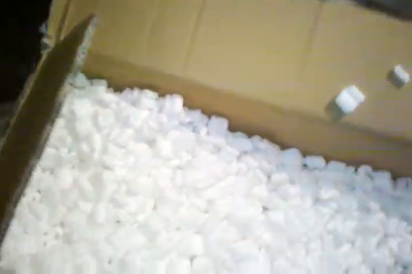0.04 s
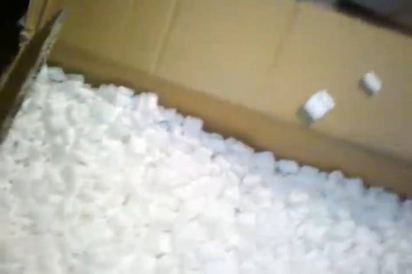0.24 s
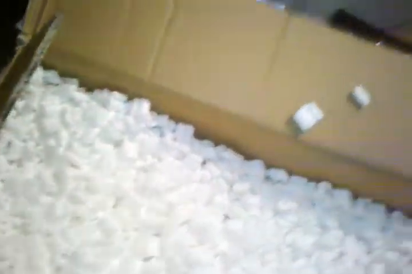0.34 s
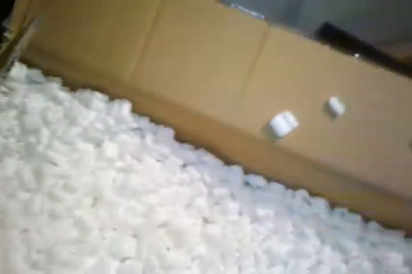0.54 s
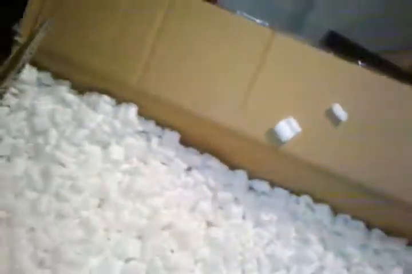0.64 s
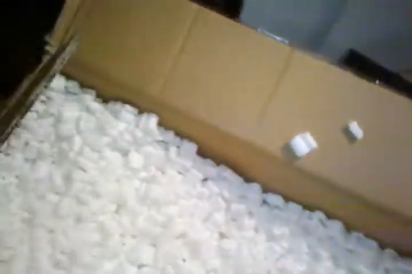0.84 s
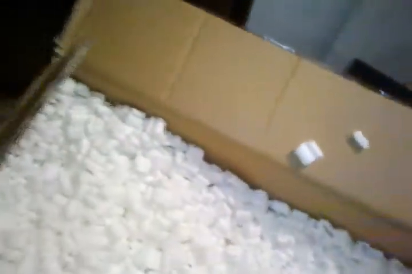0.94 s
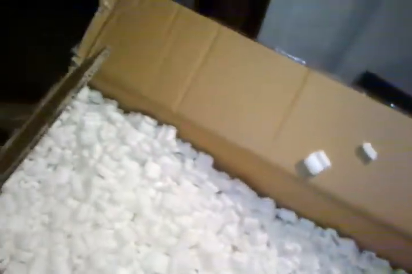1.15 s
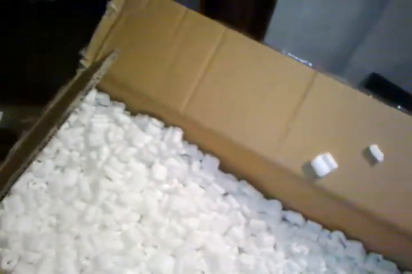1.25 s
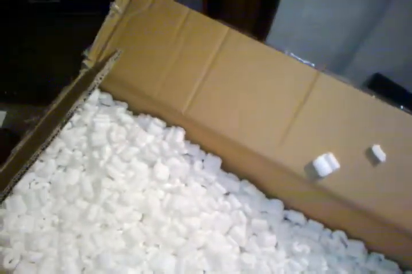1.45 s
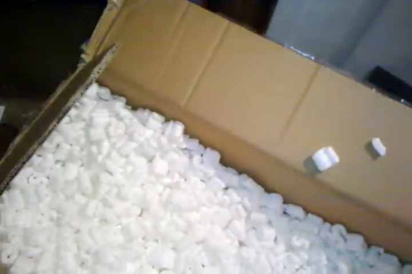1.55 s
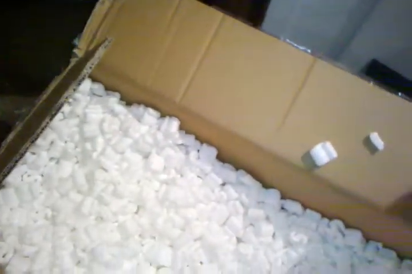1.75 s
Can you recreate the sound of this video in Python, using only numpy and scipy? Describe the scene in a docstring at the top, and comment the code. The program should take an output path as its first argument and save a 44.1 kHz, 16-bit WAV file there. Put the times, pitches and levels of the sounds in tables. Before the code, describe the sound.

Foam packing peanuts rustle in a cardboard box, close and wide in stereo. Faint rubbing opens; at 0.23-0.27 s bright snaps cluster into one hard crack on the right. Squeaky, gritty strokes follow, strongest around 0.4-0.6 s, with light cardboard knocks near 0.38, 0.49 and 0.88 s. After 1.05 s, a soft low bump and dull handling rumble, then sparse tiny ticks over faint room noise until about 1.8 s.

```python
"""A hand rubs close to the microphones beside a box of foam packing peanuts, over faint room noise, hum and
hiss: rubbing strokes of tiny slips. Sharp snaps of filtered noise cluster at 0.23-0.27 s with one hard crack;
light modal knocks start at 0.38 s. From 1.05 s a low handling rumble rises with a soft bump, rubbing dies out
and pieces tick into place. The close microphones' stereo is widened by subtracting each, delayed, from the
other; gain control follows."""
import sys
import numpy as np
from scipy import signal
from scipy.fft import rfft, irfft, next_fast_len
from scipy.io import wavfile
from scipy.ndimage import map_coordinates

SR = 44100
rng = np.random.default_rng(int(sys.argv[2]) if len(sys.argv) > 2 else 0)


def pcm_store(signal):
    """Save signal as 16-bit PCM."""
    levels = np.round(np.clip(np.atleast_2d(signal), -1, 1) * 32767)
    wavfile.write(sys.argv[1], SR, levels.astype(np.int16).T)


N = 79380

# Levels are nominal, ahead of source filters, microphone balance, widening and gain control.
# rubbing strokes: full_from_s, rise_s, hold_s, fall_s, level_db; rise and fall span 20 dB
RUB_STROKES = [(0.0, 0.016, 0.086, 0.3, -51.5), (0.221, 0.034, 0.05, 0.019, -46),
               (0.291, 0.0085, 0.007, 0.2, -42), (0.388, 0.065, 0.0066, 0.017, -34),
               (0.414, 0.023, 0.027, 0.059, -40.5), (0.484, 0.026, 0.017, .11, -31.5),
               (0.659, 0.055, 0.037, 0.079, -42.5), (.772, 0.02, 0.058, 0.0093, -37.5),
               (0.864, 0.046, 0.063, 0.042, -42), (.998, 0.066, 0.027, 0.034, -45.5),
               (1.088, 0.055, 0.018, 0.15, -57.5), (1.337, 0.083, .015, 0.045, -61.5),
               (1.717, 0.018, 0.02, .04, -64.5)]
# rubbing friction spectrum: freq_hz, level_db_per_hz
RUB_SPECTRUM = [(100, -47), (400, -13), (900, -11.5), (1500, -14), (2100, -8.5), (2800, -15.5),
                (3500, -11), (4500, -0.5), (7200, 1.5), (8700, -3.5), (10000, -1), (11800, -3), (13700, 2)]
# snaps and crunches: start_s, level_db, hold_s, t60_s, tilt_db_per_octave
FOAM_SNAPS = [(0.0236, -36, 0.00083, 0.0037, 10), (.155, -55, 0.0026, 0.004, 0),
              (0.2297, -33.5, 0.0009, 0.004, 4), (0.2312, -34.5, 0.0015, 0.0083, -1),
              (0.247, -25.5, 0.0012, 0.007, 4), (0.257, -28.5, 0.0012, 0.0041, 4.5),
              (0.2638, -26, 0.0009, 0.0013, -6.5), (0.265, -18, 0.00071, 0.004, -4),
              (0.2676, -21.5, 0.00083, .002, -8), (0.2696, -25, 0.009, 0.04, -2),
              (0.271, -17.5, 0.00049, 0.0011, -1), (0.7547, -38.5, 0.00099, 0.0022, -7.5),
              (.953, -45, .001, .004, 1), (1.144, -49, .001, 0.0038, 4), (1.498, -48, 0.0006, 0.0073, -2),
              (1.516, -53, 0.00078, 0.0027, -9)]
# snapping foam spectrum: freq_hz, level_db_per_hz
SNAP_SPECTRUM = [(500, -31.5), (2300, -16), (3600, -8.5), (4600, 1.5), (5800, -1.5), (7400, 6.5),
                 (8600, -1), (9900, 2.5), (11800, -4), (13300, 6.5)]
# cardboard modes: freq_hz, level_db, t60_s
BOX_MODES = [(554, 10, 0.036), (901, 6.5, 0.04), (995.5, 2, 0.055), (1183, -6, 0.05), (1390, -0.5, 0.037),
             (1800, -1, 0.035), (2026, 3.5, 0.055), (2297, 10, 0.031)]
# knocks: start_s, level_db (before KNOCK_TRIM_DB), centre_hz, width_octaves
BOX_KNOCKS = [(0.38, -41, 1460, 0.31), (0.4825, -30.5, 1700, 0.83), (.4868, -28, 1830, 0.86),
              (0.4905, -34.5, 1165, 0.15), (.5005, -36.5, 990, 0.12), (.772, -47, 900, 1),
              (.876, -34.5, 2130, 0.096), (.884, -34.5, 1570, 0.41), (.8845, -37, 880, 0.045),
              (1.0957, -45.5, 1180, 0.45), (1.345, -51, 1830, 0.095), (1.684, -44.5, 1010, 0.07),
              (1.775, -52, 1190, 0.058)]
# knock scuff spectrum: freq_hz, level_db_per_hz
SCUFF_SPECTRUM = [(250, -29), (600, 4), (1100, -4), (2200, -9), (3300, 11), (5000, -10)]
# settling pieces: start_s, level_db (before the attack), pitch_hz
SETTLING_TICKS = [(1.105, -49, 4320), (1.335, -42, 4250), (1.513, -49.5, 4220), (1.704, -51.5, 4220)]
# handling rumble level: time_s, level_db
RUMBLE_LEVEL = [(0, -66.5), (1.03, -88), (1.052, -53), (1.105, -49.5), (1.14, -57.5), (1.4, -57.5),
                (1.62, -57.5), (1.8, -55)]
# handling rumble spectrum: freq_hz, level_db_per_hz
RUMBLE_SPECTRUM = [(30, -27), (60, -21), (110, -5), (170, 1.5), (300, -3), (500, -5.5), (900, -37),
                   (2000, -69)]
# room noise spectrum: freq_hz, level_db_per_hz
ROOM_SPECTRUM = [(25, -35), (60, -12.5), (120, -2.5), (250, -2), (450, 2.5), (700, -3.5), (1050, -6.5),
                 (1500, -17), (2200, -9.5), (3200, -24.5), (4300, -34), (5500, -19), (9000, -19),
                 (13800, -17.5)]
# hum lines: pitch_hz, rms_db
HUM_LINES = [(397, -67), (457, -69.5), (518, -63.5)]
# mid-range hiss level: time_s, level_db
HISS_ENVELOPE = [(0, -52), (.2, -60), (0.301, -64), (1.15, -68), (1.35, -65), (1.45, -64.5), (1.55, -65.5),
                 (1.621, -76.5), (1.68, -73), (1.78, -63)]
# mid-range hiss spectrum: freq_hz, level_db_per_hz
HISS_SPECTRUM = [(600, -4), (1500, -9), (2200, -3.5), (3200, 0), (4300, 0), (5500, -14), (12000, -38)]
# likeness of the two microphones for rubbing, room and hiss, rumble: freq_hz, correlation (0-1)
RUB_LIKENESS = [(200, 0.9), (900, 0.97), (2200, 0.02), (4000, 0), (10000, 0.03)]
ROOM_LIKENESS = [(60, 0.029), (400, 0.46), (1000, 0.67), (3000, 0.013)]
RUMBLE_LIKENESS = [(100, 0.13), (500, 0.83)]
# stereo widening, part of the opposite microphone taken away: freq_hz, share (0-1)
CROSS_SHARE = [(60, 0.69), (300, 0.11), (700, 0.99), (1400, 0.92), (3000, 1), (4500, 0.86), (6000, 0.24),
               (9000, 0.18), (14000, 0.14)]

GRAINS_PER_S, GRAIN_SPREAD_DB, GRAIN_POWER_SHARE, FLUTTER_DB = 3500, 5, 0.46, 1.34
SQUEAKS_PER_S, SQUEAK_HZ, SQUEAK_OCTAVES, SQUEAK_T60_S = 1200, 6993, 0.5, 0.021
SQUEAK_DB, SQUEAK_SPREAD_DB = -6, 3.5  # level against the friction
ROOM_DB, ROOM_WAVER_DB, HISS_WAVER_DB, HUM_WAVER_RAD = -57.5, 0.8, 1.5, 0.3
RUMBLE_WAVER_DB = 2.8
BUMP_S, BUMP_DB, BUMP_HZ, BUMP_OCTAVES_PER_S = 1.083, -46, 300, 18
BUMP_RISE_S, BUMP_FALL_S = 0.023, 0.012
SNAP_LEFT_DB = 2
CRACK_S, CRACK_DB, CRACK_HZ, CRACK_HALF_LENGTH_S = 0.26505, -3, 6100, 0.00012
KNOCK_TRIM_DB, KNOCK_ATTACK_S, KNOCK_ROUGHNESS = -19.0, 0.00088, 0.31
SCUFF_DB, SCUFF_T60_S = -2.5, 0.034  # level against the ring, at a firm knock
FIRM_KNOCK_DB, SCUFF_GROWTH_DB_PER_DB = -30, 0.24
TICK_T60_S, TICK_ATTACK_S, TICK_ROUGHNESS = 0.012, 0.0011, 0.3
FOAM_LAG_S, ROOM_LAG_S = 0.00014, 0.00019  # left behind right
MIC_BALANCE_DB = -0.5  # added to left, taken from right
CROSS_DELAY_S, TOP_HZ = 0.000337, 14000
AGC_DB, AGC_SHARE, AGC_ATTACK_S, AGC_RECOVER_DB_PER_S = -17.5, 0.31, 0.0071, 10.5


def amp(db):
    """Decibels to amplitude."""
    return 10 ** (np.asarray(db) / 20)


def unit(x):
    """Scale to rms 1."""
    return x / np.sqrt(np.mean(x ** 2) + 1e-20)


def along(points, hz):
    """Interpolate (freq_hz, value) points on a log frequency axis."""
    f, v = np.transpose(points)
    return np.interp(np.log(hz + 1), np.log(f + 1), v)


def wobble(knots_per_s):
    """Smooth random curve."""
    knots = rng.standard_normal(int(N * knots_per_s / SR) + 4)
    return map_coordinates(knots, [np.arange(N) * knots_per_s / SR])


def filtered(x, response):
    """Apply a complex frequency response."""
    m = next_fast_len(N + SR // 2)
    return irfft(rfft(x, m) * response(np.fft.rfftfreq(m, 1 / SR)), m)[..., :N]


def add(track, start_s, sound):
    """Mix in a short sound, cut at the track end."""
    part = track[..., round(start_s * SR):][..., :sound.shape[-1]]
    part += sound[..., :part.shape[-1]]


def from_right(x, lag_s):
    """Sound reaches the right microphone lag_s before the left."""
    side = np.array([[-1], [1]])
    return filtered(x, lambda hz: np.exp(1j * np.pi * hz * lag_s * side))


def at_mics(pair, spectrum, likeness):
    """Colour two unrelated signals and mix them to the given microphone correlation; rms 1."""
    def response(hz):
        angle = np.arccos(along(likeness, hz)) / 2
        colour = amp(along(spectrum, hz)) * (hz < TOP_HZ)
        return colour * np.array([np.cos(angle), np.sin(angle)])

    mid, side = filtered(pair, response)
    return unit(np.array([mid + side, mid - side]))


def squeaks():
    """Tiny slips squeak: short decaying rings, each at its own pitch and stereo place."""
    count = 4000  # more than the duration needs
    u, z = rng.random((count, 2)), rng.standard_normal((count, 2))
    start_s = np.cumsum(-np.log(1 - u[:, 0])) / SQUEAKS_PER_S
    hz = np.clip(SQUEAK_HZ * 2 ** (SQUEAK_OCTAVES * z[:, :1]), 3600, TOP_HZ)
    k = np.arange(SR // 40)
    decay = amp(SQUEAK_SPREAD_DB * z[:, 1:] - 60 * k / SR / SQUEAK_T60_S)
    rings = decay * np.sin(2 * np.pi * hz * k / SR)
    at = ((start_s[:, None] * SR).astype(int) + k).ravel()
    left = u[:, 1:2]
    channels = [np.bincount(at, (rings * gain).ravel(), N)[:N] for gain in (left, 1 - left)]
    return unit(np.array(channels))


def rubbing():
    """Strokes of the hand release many tiny slips and squeaks over smooth noise."""
    t = np.arange(N) / SR
    power = np.zeros(N)
    for full_s, rise_s, hold_s, fall_s, level_db in RUB_STROKES:
        rise_db = 20 * np.maximum((full_s - t) / rise_s, 0)
        fall_db = 20 * np.maximum((t - full_s - hold_s) / fall_s, 0)
        power += amp(level_db - rise_db - fall_db) ** 2
    sizes = amp(GRAIN_SPREAD_DB * np.minimum(rng.exponential(size=(2, N)), 4))
    sizes *= rng.choice([-1, 1], (2, N))
    slips = unit(sizes * (rng.random((2, N)) < GRAINS_PER_S / SR))
    smooth = rng.standard_normal((2, N))
    friction = np.sqrt(GRAIN_POWER_SHARE) * slips + np.sqrt(1 - GRAIN_POWER_SHARE) * smooth
    rustle = at_mics(friction, RUB_SPECTRUM, RUB_LIKENESS) + amp(SQUEAK_DB) * squeaks()
    flutter = amp(FLUTTER_DB * wobble(119.9))
    return from_right(np.sqrt(power) * flutter * unit(rustle), FOAM_LAG_S)


def room():
    """Soft coloured indoor noise plus hum lines with wandering phase."""
    t = np.arange(N) / SR
    noise = at_mics(rng.standard_normal((2, N)), ROOM_SPECTRUM, ROOM_LIKENESS)
    air = amp(ROOM_DB + ROOM_WAVER_DB * wobble(16.35)) * noise
    hum = np.zeros(N)
    for hz, rms_db in HUM_LINES:
        phase = 2 * np.pi * hz * t + HUM_WAVER_RAD * wobble(6.67)
        hum += amp(rms_db) * np.sqrt(2) * np.sin(phase)
    return from_right(air + hum, ROOM_LAG_S)


def hiss():
    """Faint mid-range noise comes and goes."""
    level_db = np.interp(np.arange(N) / SR, *np.transpose(HISS_ENVELOPE))
    noise = at_mics(rng.standard_normal((2, N)), HISS_SPECTRUM, ROOM_LIKENESS)
    return amp(level_db + HISS_WAVER_DB * wobble(60.6)) * noise


def handling():
    """Dull uneven low noise of handling, with a soft bump rising in pitch to its peak."""
    t = np.arange(N) / SR
    since_s = t - BUMP_S
    hz = BUMP_HZ * 2 ** (BUMP_OCTAVES_PER_S * np.minimum(since_s, 0))
    swell = np.exp(-(since_s / np.where(since_s < 0, BUMP_RISE_S, BUMP_FALL_S)) ** 2)
    bump = amp(BUMP_DB) * swell * np.sin(2 * np.pi * np.cumsum(hz) / SR)
    level_db = np.interp(t, *np.transpose(RUMBLE_LEVEL))
    noise = at_mics(rng.standard_normal((2, N)), RUMBLE_SPECTRUM, RUMBLE_LIKENESS)
    return bump + amp(level_db + RUMBLE_WAVER_DB * wobble(30.1)) * noise


def snaps():
    """Foam catches and lets go: gritty decaying bursts, and one piece breaks at the right microphone."""
    out, t = np.zeros((2, N)), np.arange(SR // 25) / SR
    hz = np.fft.rfftfreq(len(t), 1 / SR)
    octaves = np.log2(hz / TOP_HZ + 0.0089)  # offset keeps 0 Hz finite
    for start_s, level_db, hold_s, t60_s, tilt_db in FOAM_SNAPS:
        colour = amp(along(SNAP_SPECTRUM, hz) + tilt_db * octaves) * (hz < TOP_HZ)
        grit = unit(irfft(rfft(rng.standard_normal((2, len(t)))) * colour, len(t)))
        add(out, start_s, grit * amp(level_db - 60 * np.maximum(t - hold_s, 0) / t60_s))
    out[0] *= amp(SNAP_LEFT_DB)
    since_s = np.arange(N) / SR - CRACK_S
    pulse = np.exp(-(since_s / CRACK_HALF_LENGTH_S) ** 2)
    out[1] += amp(CRACK_DB) * pulse * np.cos(2 * np.pi * CRACK_HZ * since_s)
    return signal.sosfilt(signal.butter(3, 2800, "high", fs=SR, output="sos"), out)


def knocks():
    """Light blows ring the box modes near the contact's favoured pitch; firmer ones scuff more."""
    out, t = np.zeros((2, N)), np.arange(SR // 8) / SR
    scuff_colour = amp(along(SCUFF_SPECTRUM, np.fft.rfftfreq(len(t), 1 / SR)))
    for start_s, level_db, centre_hz, octaves in BOX_KNOCKS:
        ring = np.zeros(len(t))
        for hz, mode_db, t60_s in BOX_MODES:
            weight = np.exp(-0.5 * (np.log2(hz / centre_hz) / octaves) ** 2)
            drift = KNOCK_ROUGHNESS * np.cumsum(rng.standard_normal(len(t))) * np.sqrt(hz / SR)
            phase = 2 * np.pi * (hz * t + rng.random()) + drift
            ring += weight * amp(mode_db - 60 * t / t60_s) * np.sin(phase)
        grit = irfft(rfft(rng.standard_normal((2, len(t)))) * scuff_colour, len(t))
        scuff = unit(grit * amp(-60 * t / SCUFF_T60_S))
        scuff_db = SCUFF_DB + SCUFF_GROWTH_DB_PER_DB * (level_db - FIRM_KNOCK_DB)
        blow = unit(ring) + amp(scuff_db) * scuff
        blow *= 1 - np.exp(-t / KNOCK_ATTACK_S)
        add(out, start_s, amp(level_db + KNOCK_TRIM_DB) * unit(blow))
    high_pass = signal.butter(2, 400, "high", fs=SR, output="sos")
    return from_right(signal.sosfilt(high_pass, out), FOAM_LAG_S)


def ticks():
    """Single pieces slip into place: short rings with randomly drifting phase."""
    out, t = np.zeros((2, N)), np.arange(SR // 30) / SR
    for start_s, level_db, hz in SETTLING_TICKS:
        drift = TICK_ROUGHNESS * np.cumsum(rng.standard_normal(len(t))) * np.sqrt(hz / SR)
        envelope = amp(level_db - 60 * t / TICK_T60_S) * (1 - np.exp(-t / TICK_ATTACK_S))
        add(out, start_s, envelope * np.sin(2 * np.pi * hz * t + drift))
    return out


def scene():
    """All sources at the two microphones, with the balance applied."""
    mix = rubbing() + room() + hiss() + handling() + snaps() + knocks() + ticks()
    return mix * amp([[MIC_BALANCE_DB], [-MIC_BALANCE_DB]])


def widen(x):
    """Subtract a delayed, frequency-dependent share of the opposite channel."""
    def cross(hz):
        return along(CROSS_SHARE, hz) * np.exp(-2j * np.pi * hz * CROSS_DELAY_S)

    return x - filtered(x[::-1], cross)


def gain_control(x):
    """Peaks over the threshold duck both channels; the gain then creeps back up."""
    peak_db = 20 * np.log10(np.abs(x).max(0) + 1e-9)
    excess_db = AGC_SHARE * np.maximum(peak_db - AGC_DB, 0)
    recovered_db = AGC_RECOVER_DB_PER_S * np.arange(N) / SR
    duck_db = np.maximum.accumulate(excess_db + recovered_db) - recovered_db
    pole = np.exp(-1 / (AGC_ATTACK_S * SR))
    return x * amp(-signal.lfilter([1 - pole], [1, -pole], duck_db))


def record(dry):
    """Stereo widening, gain control, then the band limit."""
    return filtered(gain_control(widen(dry)), lambda hz: hz < TOP_HZ)


dry = scene()
out = record(dry)
pcm_store(out)
```